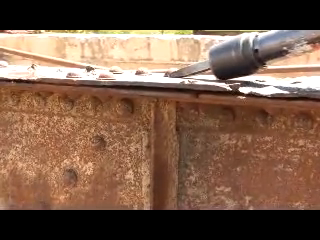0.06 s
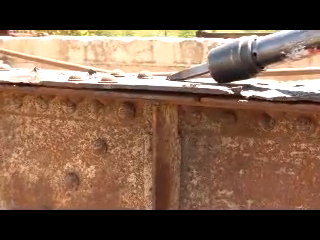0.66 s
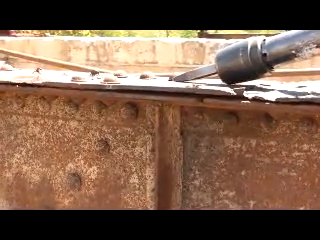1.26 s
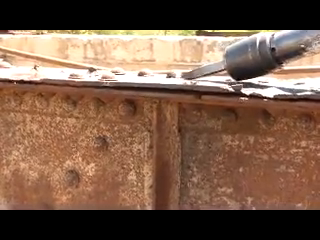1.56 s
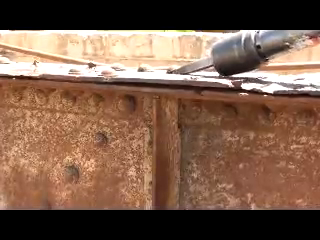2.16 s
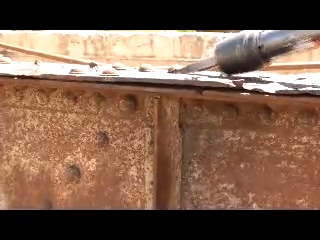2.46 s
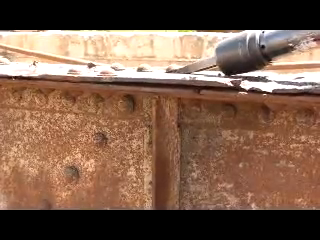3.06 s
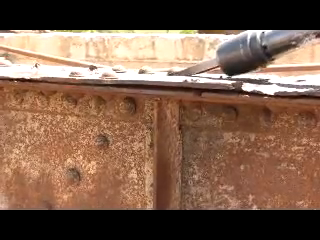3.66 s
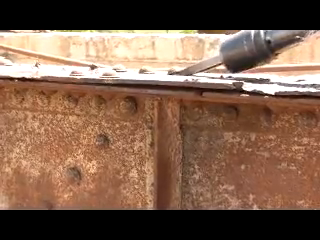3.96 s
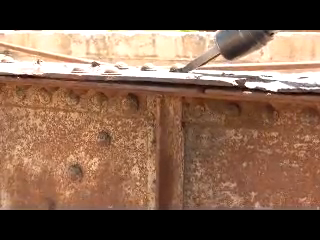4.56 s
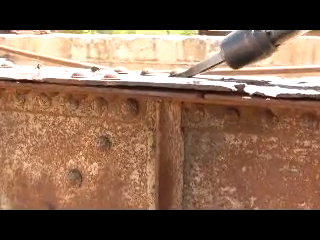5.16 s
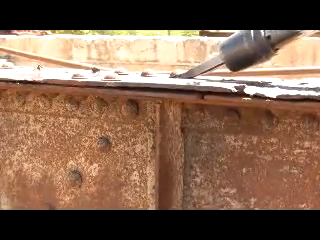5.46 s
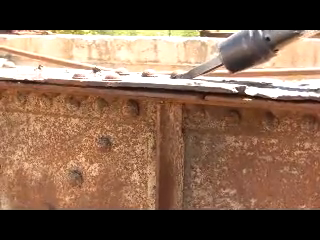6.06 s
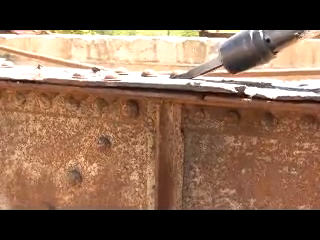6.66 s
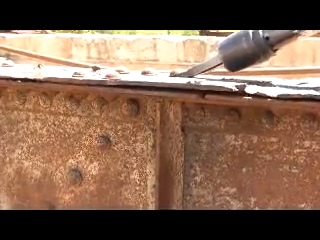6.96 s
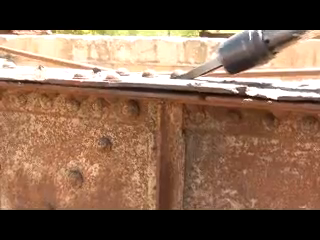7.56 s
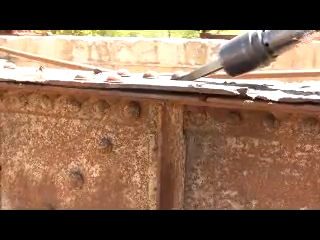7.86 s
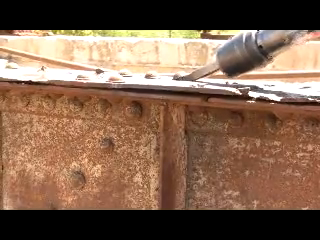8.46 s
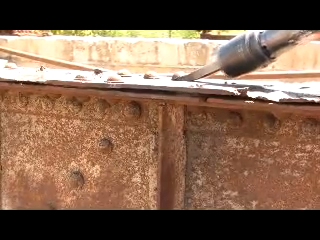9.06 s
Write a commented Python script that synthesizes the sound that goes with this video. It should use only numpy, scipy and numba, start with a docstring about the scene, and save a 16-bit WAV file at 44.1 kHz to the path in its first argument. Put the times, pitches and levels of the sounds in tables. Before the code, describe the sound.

A pneumatic hammer chisels a ringing iron girder in three loud bursts, with a compressor drone and hose hiss in the pauses.

```python
"""A pneumatic hammer chisels at the rivets of an iron girder, in front of a stereo microphone in a yard.
It runs in three bursts of some 14 blows a second, with a few loose knocks in between. At each blow
the exhaust pops, the tip cracks and the girder chirps and rings; spent air puffs out on the return.
Farther back a compressor engine drones and a hose leaks. The camera's limiter holds the hammering
down and lets engine and leak swell up in the pauses."""
import sys
import numpy as np
from scipy import signal
from scipy.fft import rfft, irfft
from scipy.io import wavfile
from numba import njit

SR = 44100
rng = np.random.default_rng(int(sys.argv[2]) if len(sys.argv) > 2 else 0)


def write(x):
    x = np.atleast_2d(x).T
    wavfile.write(sys.argv[1], SR, np.round(np.clip(x, -1, 1) * 32767).astype(np.int16))


N = 410571
LEAD = SR // 3  # samples of run-up before the scene opens
TIME = np.arange(-LEAD, N) / SR
RING_TIME = np.arange(65536) / SR  # seconds since a strike
LEFT_RIGHT = np.array([[1], [-1]])

# image at the microphone pair: freq_hz, side_minus_mid_db, left_minus_right_db
STEREO_IMAGE = [(100, -5.5, 0.5), (292, -19.5, 3.5), (700, -8, 1.2), (1340, -7, 1.1), (2920, -4.5, -2),
                (6000, -4.5, -1.5), (9150, -6, 0.5), (14700, 0, -2)]
# compressor engine harmonics: multiple of the firing rate, level_db
ENGINE_HARMONICS = [(1, -4), (2, 1), (3, -14), (4, -11), (5, -17), (6, -16), (7, -19), (9, -19)]
# engine clatter from across the yard: freq_hz, density_db
CLATTER_SPECTRUM = [(20, -41), (70, -11), (130, -3.5), (200, 5.5), (310, 0.5), (550, -3), (1000, -12),
                    (1600, -17.5), (2600, -31), (6000, -44)]
# hiss of the leaking hose: freq_hz, density_db
LEAK_SPECTRUM = [(1500, -6.5), (3000, -6.5), (4300, -3.5), (4900, -0.5), (5150, -1.5), (5500, 0),
                 (6000, -1.5), (6700, -3.5), (7600, -3), (9000, -3.5), (10500, -11), (13000, -15),
                 (16000, -23)]

# spent air at the exhaust port: freq_hz, density_db
EXHAUST_SPECTRUM = [(150, -35), (600, 14.5), (1500, 7.5), (3000, 8), (3950, 10), (4700, 4.5), (7000, 3.5),
                    (10000, 2.5), (13000, -1.5), (16000, -8)]
# air rushing through as the trigger opens and closes: start_s, peak_s, end_s, level_db
AIR_RUSHES = [(.87, 1.1, 1.34, -28), (2.31, 2.33, 2.84, -6), (4.11, 4.8, 4.5, -32), (4.662, 4.742, 5.6, -7)]
# the port coughs as the piston gets going: start_s, pop_db, pitch_hz, t60_s, blast_db
PORT_COUGHS = [(2.3232, 6, 330, .025, 4), (2.3695, 9, 600, .014, 17), (4.6698, 6, 330, .02, 4),
               (4.7152, 9, 600, .014, 17)]
# air blast of a cough: freq_hz, density_db
COUGH_SPECTRUM = [(30, -14), (150, 0), (500, 1.5), (1000, -1), (1600, -11), (2600, -23), (8000, -31),
                  (16000, -40)]

# clink of the loose chisel in the barrel: freq_hz, density_db
CLINK_SPECTRUM = [(1500, -16), (2250, -4), (2800, -25), (3400, -1), (3950, 2), (4400, -8), (5000, -10),
                  (6000, -32), (7200, -9), (9000, -43)]
# modes of the barrel: pitch_hz, level_db, t60_s
BARREL_RING = [(3950, 10, .11), (4060, 24, .07)]
# crack at the chisel tip: freq_hz, density_db
CRACK_SPECTRUM = [(40, -26), (130, 7.5), (800, 0.5), (2500, 4), (4000, 5), (6000, -1.5), (8000, -3.5),
                  (11000, -4), (13500, -8), (16000, -12.5)]
# modes of the chisel shank: pitch_hz, level_db, t60_s
SHANK_RING = [(3450, -9.5, 0.49), (4610, -6.5, 0.22), (5450, -8.5, 0.19), (5830, -12.5, 0.49),
              (7150, 0, 0.19), (10000, -7.5, 0.08), (11900, -9, 0.073), (12400, -7.5, 0.12),
              (14300, -18, 0.091)]

# strongest modes of the girder: pitch_hz, level_db, t60_s
GIRDER_RING = [(181, -3, .9), (216, -5, 1.2), (227, -3, .8), (296, 2, .7), (442, -4.5, .6), (488, -7, .7),
               (585, -5, 1.5), (683, -6, .55), (880, -8, .6), (967, -4, .8), (1036, -2, .7),
               (1222, -2, .55), (1502, -5, .45), (1686, -6, .25), (1810, -6, .3), (1944, -8, .35),
               (2056, -7, .28), (2160, -8, .15), (2374, -6, .11), (2562, -8, .18)]
# its dense lesser modes: freq_hz, density_db, t60_s
GIRDER_WASH = [(69.85, -70, .6), (107.04, -13.5, 0.4), (166, 0, 1), (258, 2.5, 0.54), (326, -3.5, 0.73),
               (515, 3.5, 0.38), (840, -1, 0.29), (1110, 1.5, 0.37), (1520, -5.5, 0.18), (1740, -1, 0.21),
               (2490, -1.5, 0.1), (2860, -8.5, 0.1), (4200, -11, 0.21), (7350, -21.5, 0.058)]
# bending waves coming back from its edges: travel_s (at 1 kHz), level_db
EDGE_ECHOES = [(0.012, -4), (.019, -3), (0.027, 0.5), (.031, -5), (.039, -3.5)]
# colour of those echoes: freq_hz, density_db
ECHO_SPECTRUM = [(130, -28), (200, 1.5), (300, 3.5), (380, -6.5), (450, 3.5), (550, 1.5), (670, 1.5),
                 (1100, -1.5), (1450, -7), (1800, -2.5), (2350, -3.5), (2900, -18.5), (6000, -31)]

# how the tool bears on the girder: time_s, low_ring_db, mid_clang_db, shank_ring_db
TOOL_GRIP = [(0, -4, 0.5, -7), (.9, -4, 2, -8), (2.4, -0.5, 0, -9), (3.6, -1.5, 0.5, -4),
             (3.9, 0.5, 0, -3.5), (4.799, 3, -2, -1), (5.8, -2, -2.5, -4), (6.6, -1.5, -2, -3),
             (7.6, -1, -2, -3), (9.3, -1, -1, -13)]
# the loose tool knocks on the iron: start_s, girder_db, crack_db, shank_ring_db, clink_db
LOOSE_TAPS = [(0.94, -17.5, -2.5, -9.5, 6), (1.8798, -28.5, -42, -34, -10), (1.8968, -33, -47, -42, -9),
              (4.184, -23, -5.5, -6, -22)]
# the trigger is held: start_s, end_s, strength_db, crack_db
TRIGGER_PULLS = [(0.0275, .89, -3, -3), (2.3985, 4.12, -2.5, -1.5), (4.745, 9.28, -2, -3.5)]
# the piston's pace follows how hard the tool is leant on, one curve a pull: time_s, blows_per_s
PISTON_PACE = [
    [(0.34, 14.53), (0.44, 13.78), (0.58, 15.41), (0.65, 14.5)],
    [(2.55, 14.0), (2.62, 13.21), (3.09, 13.48), (3.39, 13.56), (3.46, 13.32), (3.87, 14.4), (3.94, 13.42)],
    [(4.82, 13.9), (4.96, 14.53), (5.32, 14.0), (5.41, 15.01), (5.79, 14.35), (6.12, 15.61), (6.66, 14.9),
     (7.58, 15.42), (8.28, 13.13), (8.41, 14.75), (8.54, 13.23), (8.66, 14.71), (9.08, 15.11),
     (9.16, 13.31)],
]
# single blows land softer as the tool is lifted or the chisel slips: time_s, level_db
WEAK_BLOWS = [(.85, -1.5), (3.8, -6.5), (4.02, -5), (4.09, -8), (8.27, -8), (8.48, -3.5)]


def undb(db):
    """Decibels to gain."""
    return 10 ** (np.asarray(db) / 20)


def unit(x):
    """Scale to rms 1."""
    return x / np.sqrt(np.mean(x ** 2))


def at_hz(table, hz, column=1):
    """Read a column of a table on a log-frequency axis."""
    table = np.array(table, float)
    return np.interp(np.log(np.maximum(hz, 1)), np.log(table[:, 0]), table[:, column])


def butter(x, order, hz, kind):
    """Butterworth filter."""
    return signal.sosfilt(signal.butter(order, hz, kind, fs=SR, output="sos"), x)


def balance(hz):
    """Left and right gains at the microphone pair."""
    return undb(LEFT_RIGHT * at_hz(STEREO_IMAGE, hz, column=2) / 2)


def noise(spectrum, size=len(TIME)):
    """Stereo noise of a given colour, wider towards the treble."""
    hz = np.arange(size // 2 + 1) * SR / size
    mid, side = rfft(rng.standard_normal((2, size)))
    pair = (mid + LEFT_RIGHT * side * undb(at_hz(STEREO_IMAGE, hz))) * balance(hz)
    return unit(irfft(pair * undb(at_hz(spectrum, hz)), size))


def fade(t60):
    """Exponential decay, 60 dB down after t60 seconds."""
    return np.exp(-np.log(1000) * RING_TIME / t60)


def envelope(rise_s, t60):
    """Quick rise, then exponential decay."""
    return fade(t60) * (1 - np.exp(-RING_TIME / rise_s))


def strikes(times, db):
    """One impulse for each event."""
    pulses = np.zeros(len(TIME))
    np.add.at(pulses, np.searchsorted(TIME[:-1], times), undb(db))
    return pulses


def play(pulses, response):
    """Every impulse sets off the response."""
    return signal.fftconvolve(np.atleast_2d(pulses), np.atleast_2d(response))[:, :len(TIME)]


def per_blow(response):
    """Scale a response so that 14.5 of them a second give about rms 1."""
    energy = np.mean(np.sum(np.atleast_2d(response) ** 2, axis=1))
    return response * np.sqrt(SR / 14.5 / energy)


def noise_bursts(times, db, spectrum, rise_s, t60):
    """Fresh noise for each event; overlapping bursts add in power."""
    power = play(strikes(times, 2 * db), envelope(rise_s, t60) ** 2)
    return np.sqrt(np.abs(power)) * noise(spectrum)


def modes(table, build_s):
    """Decaying partials build up as waves cross the iron; each meets each microphone in its own phase."""
    ring = 0
    for hz, db, t60 in table:
        spread = np.arctan(undb(at_hz(STEREO_IMAGE, hz)))
        phase = rng.uniform(0, 2 * np.pi) + LEFT_RIGHT * rng.choice([-1, 1]) * spread
        partial = np.sin(2 * np.pi * hz * RING_TIME + phase) * envelope(build_s, t60)
        ring = ring + per_blow(partial) * undb(db) * balance(hz)
    return per_blow(ring)


def compressor(firing_hz=54.15):
    """At the back, the engine drones at a slightly wandering speed; its clatter throbs as it fires."""
    wander = np.interp(TIME, np.linspace(0, N / SR, 60), rng.standard_normal(60))
    phase = 2 * np.pi * np.cumsum(firing_hz * (1 + 0.0074 * wander)) / SR
    drone = sum(undb(db) * np.sin(k * phase + rng.uniform(0, 2 * np.pi)) for k, db in ENGINE_HARMONICS)
    clatter = noise(CLATTER_SPECTRUM) * (1 + 0.064 * np.sin(phase))
    return undb(-28.5) * unit(drone) + undb(-25) * clatter


def hose_leak():
    """Air escapes from the hose in a steady background hiss."""
    return undb(-29.5) * noise(LEAK_SPECTRUM)


def pop(hz, t60):
    """A short pressure swing at the exhaust port: the rate of change of a small ringing flow."""
    omega = 2 * np.pi * hz
    flow = np.sin(omega * RING_TIME) * envelope(1 / omega, t60)
    return -np.gradient(flow) * SR / omega


def exhaust(times, blow_db):
    """A pop with each blow, a puff on the return stroke, and a coughing rush when the trigger opens."""
    pops = undb(22.5) * play(strikes(times - .0005, blow_db / 2), pop(hz=444, t60=0.0052))
    pops = butter(pops, 4, 210, "highpass")  # a small port radiates no bass
    puff = np.exp(-.5 * ((RING_TIME - .048) / 0.028) ** 2)
    flow = undb(-3) * play(strikes(times, blow_db / 2), puff)
    for start, peak, end, rush_db in AIR_RUSHES:  # the flow swells as the valve opens
        flow = flow + undb(rush_db) * np.interp(TIME, [start, peak, end], [0, 1, 0]) ** 1.36
    coughs = sum(play(strikes([start], db), pop(hz, t60)) for start, db, hz, t60, _ in PORT_COUGHS)
    cough_s, *_, blast_db = np.transpose(PORT_COUGHS)
    blasts = noise_bursts(cough_s, blast_db, COUGH_SPECTRUM, rise_s=0.00075, t60=0.025)
    return pops + coughs + blasts + flow * noise(EXHAUST_SPECTRUM)


def barrel(times, db):
    """The loose chisel rattles in the barrel, which rings briefly."""
    clinks = noise_bursts(times, db, CLINK_SPECTRUM, rise_s=0.00084, t60=0.1)
    return clinks + undb(-25) * play(strikes(times, db), modes(BARREL_RING, build_s=0.00082))


def chisel(times, crack_db, ring_db):
    """The tip crunches into rust and steel and chatters once; each blow favours other shank modes."""
    lag, force, *mode_luck = rng.standard_normal((len(times), len(SHANK_RING) + 2)).T
    contact_s = times + .0007
    crack = noise_bursts(contact_s, crack_db + 14.5, CRACK_SPECTRUM, rise_s=0.001, t60=0.083)
    chatter_s = contact_s + 0.0091 + 0.0022 * lag
    chatter_db = crack_db + 1.5 + 2 * force
    chatter = noise_bursts(chatter_s, chatter_db, CRACK_SPECTRUM, rise_s=0.0004, t60=0.13)
    shank = 0
    for (hz, db, t60), luck in zip(SHANK_RING, mode_luck):
        drive = strikes(contact_s, ring_db + db + 5.4 * luck)
        shank = shank + play(drive, modes([(hz, 0, t60)], build_s=0.00051))
    return crack + chatter + undb(-8) * shank


def girder_wash(spread_s=0.02):
    """Dense ring of the girder; bending waves are dispersive, so lows build up later than highs."""
    wash = 0
    for hz in 80 * 2 ** (np.arange(21) / 3):  # third octaves
        band = noise([(hz / 1.3, -90), (hz / 1.12, 0), (hz * 1.12, 0), (hz * 1.3, -90)], len(RING_TIME))
        arrival_s = spread_s * np.sqrt(1000 / max(hz, 500))
        build = 1 - np.exp(-(RING_TIME / arrival_s) ** 2)
        # the first passes are the strongest, before the waves leak into the rest of the structure
        t60 = at_hz(GIRDER_WASH, hz, column=2)
        decay = fade(t60) + 0.12 * fade(3.7 * t60)
        wash = wash + per_blow(band * build * decay) * undb(at_hz(GIRDER_WASH, hz)) * np.sqrt(hz)
    return per_blow(wash)


def edge_chirps(mic_gap_s=.00006):
    """Bending waves gain speed with the root of frequency, so each edge echo is a falling chirp."""
    hz = np.arange(len(RING_TIME) // 2 + 1) * SR / len(RING_TIME)
    echoes = 0
    for travel_s, db in EDGE_ECHOES:
        turns = 2 * (travel_s + np.array([[0], [mic_gap_s]])) * np.sqrt(1000 * hz)
        echoes = echoes + undb(db) * np.exp(2j * np.pi * (rng.uniform() - turns))
    chirps = irfft(echoes * undb(at_hz(ECHO_SPECTRUM, hz)))
    return per_blow(chirps[:, :len(RING_TIME) // 4])


def girder(times, db):
    """Blows ring the same iron over and over; the tip wanders, and the grip picks the modes it feeds."""
    grip_s, low_db, clang_db, _ = np.transpose(TOOL_GRIP)
    force = strikes(times, db)
    low = butter(force, 1, 700, "lowpass")
    clang = butter(force, 1, [800, 1400], "bandpass")
    for part, part_db in ((low, low_db), (clang, clang_db)):
        force = force + part * (undb(np.interp(TIME, grip_s, part_db)) - 1)
    tip_place = np.interp(TIME, np.sort(times), np.cumsum(0.35 * rng.standard_normal(len(times))))
    wash = sum(play(force * share, girder_wash()) for share in (np.cos(tip_place), np.sin(tip_place)))
    ring = play(force, modes(GIRDER_RING, build_s=0.0012))
    chirps = play(force, edge_chirps())
    iron = undb(9) * wash + undb(6) * ring + undb(6.5) * chirps
    return butter(iron, 4, 85, "highpass")  # an open plate radiates no bass


def piston_blows(surge_db=3, surge_crack_db=2, surge_s=.15, scatter_db=1.98, crack_scatter_db=0.6):
    """The piston strikes once a cycle while the trigger is held: time_s, strength_db, crack_db."""
    pulls = []
    for (start, end, strength_db, tip_db), pace in zip(TRIGGER_PULLS, PISTON_PACE):
        cycles = np.cumsum(np.interp(TIME, *np.transpose(pace))) / SR
        cycles = cycles - np.interp(start, TIME, cycles)
        first_cycle = 0 if pulls else np.ceil(cycles[0])  # the first burst is already under way
        times = np.interp(np.arange(first_cycle, np.interp(end, TIME, cycles)), cycles, TIME)
        surge = np.exp(-(times - times[0]) / surge_s)  # a fully charged hose hits harder at first
        pulls.append([times, strength_db + surge_db * surge, tip_db + surge_crack_db * surge])
    times, blow_db, crack_db = np.hstack(pulls)
    for weak_s, weak_db in WEAK_BLOWS:
        blow_db[np.argmin(abs(times - weak_s))] += weak_db
    seat, bite = rng.standard_normal((len(times), 2)).T  # no two blows seat alike
    return times, blow_db + scatter_db * seat, crack_db + crack_scatter_db * bite


def hammer():
    """Up front, piston blows and loose taps go through the same chisel into the same girder."""
    blow_s, blow_db, crack_db = piston_blows()
    tap_s, tap_db, tap_crack_db, tap_ring_db, clink_db = np.transpose(LOOSE_TAPS)
    grip_s, *_, shank_db = np.transpose(TOOL_GRIP)
    times = np.r_[blow_s, tap_s]
    ring_db = np.interp(blow_s, grip_s, shank_db) + crack_db
    clinks = barrel(tap_s, clink_db)
    iron = girder(times, np.r_[blow_db, tap_db])
    steel = chisel(times, np.r_[crack_db, tap_crack_db], np.r_[ring_db, tap_ring_db])
    return iron + steel + exhaust(blow_s, blow_db) + clinks


def scene():
    """From the microphone: the hammer in front, already at work, compressor and hose behind."""
    return (hammer() + compressor() + hose_leak())[:, LEAD:]


@njit
def limiter_gain(peaks, ceiling, attack_db_per_s, release_db_per_s):
    """Gain falls at a set rate while over the ceiling and creeps back to 1; sudden bangs slip by."""
    attack = 10 ** (-attack_db_per_s / SR / 20)
    release = 10 ** (release_db_per_s / SR / 20)
    gains = np.empty(len(peaks))
    gain = min(1., ceiling / peaks[:SR // 10].max())
    for i in range(len(peaks)):
        gain = gain * attack if peaks[i] * gain > ceiling else min(gain * release, 1.)
        gains[i] = gain
    return gains


def record(dry):
    """The camera limits the level, clips what slips through and cuts the treble above 15.75 kHz."""
    peaks = np.abs(dry).max(axis=0)
    gain = limiter_gain(peaks, ceiling=0.63, attack_db_per_s=3322.5, release_db_per_s=71)
    clipped = np.clip(dry * gain, -1, 1)
    return signal.sosfilt(signal.ellip(10, .2, 70, 15750, fs=SR, output="sos"), clipped)


dry = scene()
out = record(dry)
write(out)
```